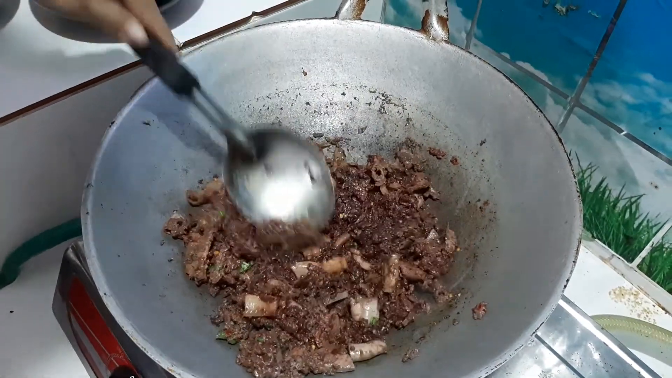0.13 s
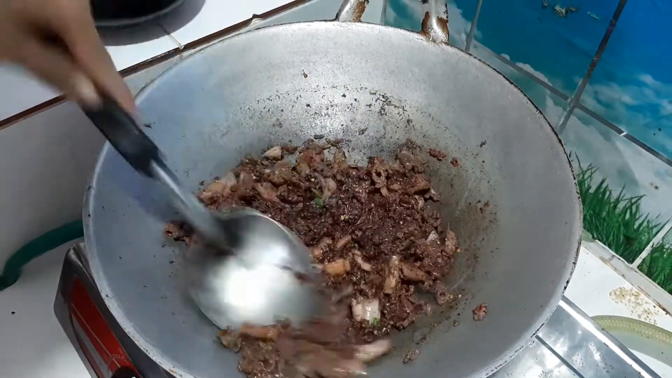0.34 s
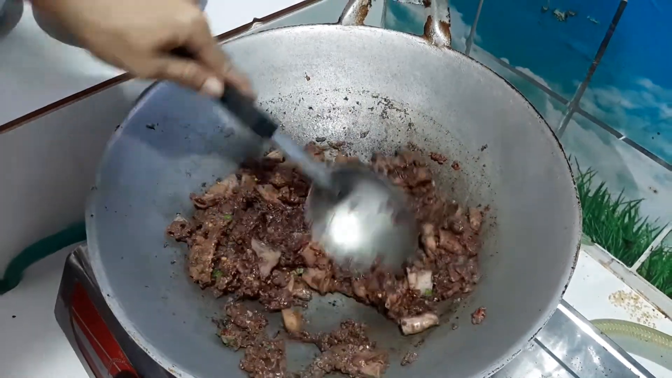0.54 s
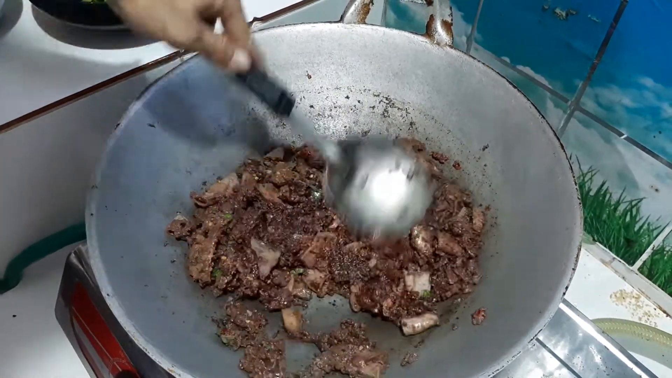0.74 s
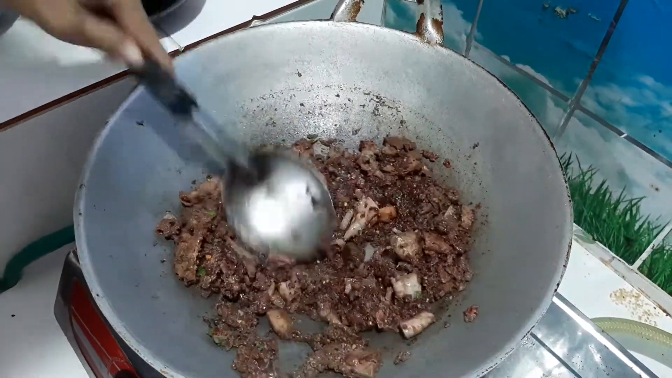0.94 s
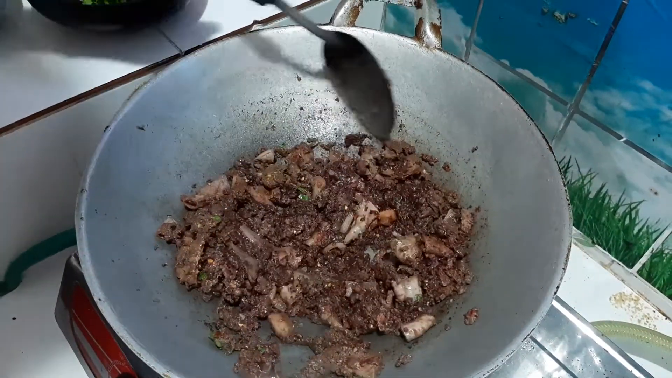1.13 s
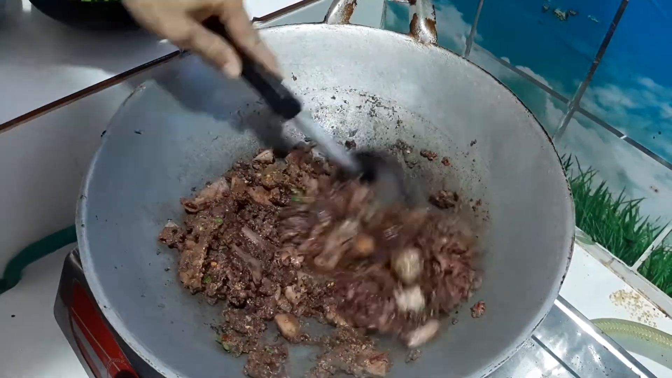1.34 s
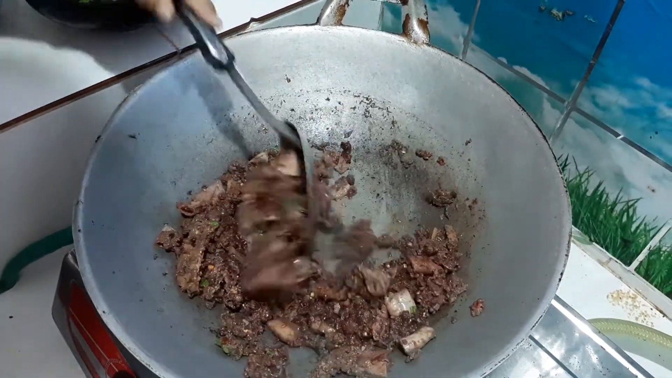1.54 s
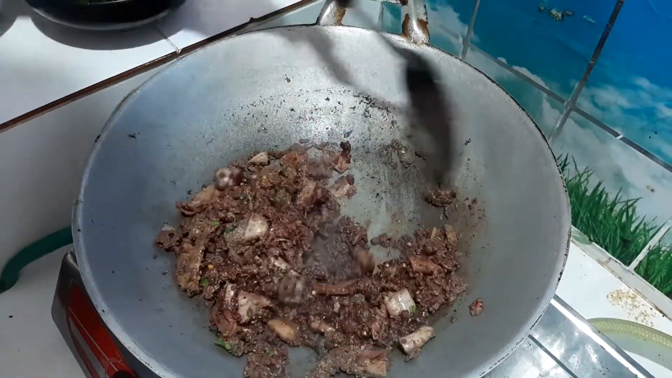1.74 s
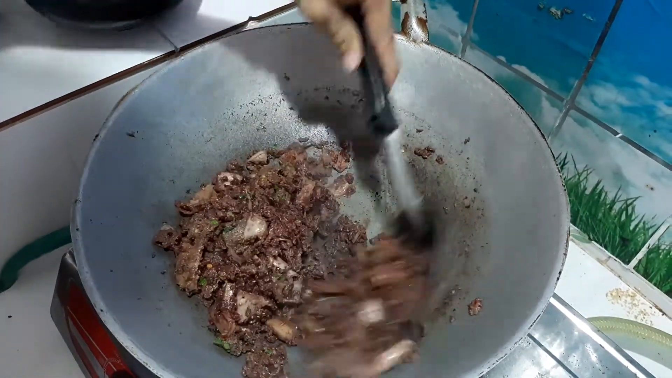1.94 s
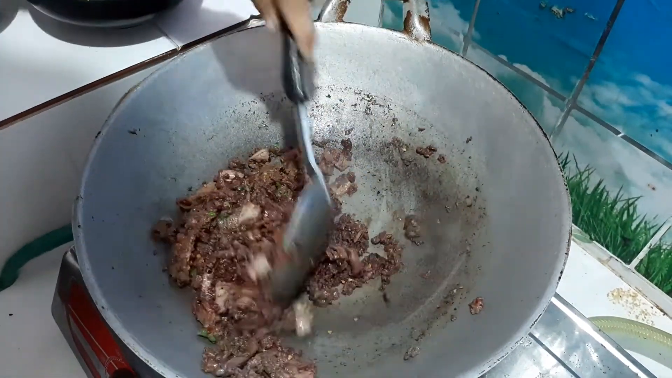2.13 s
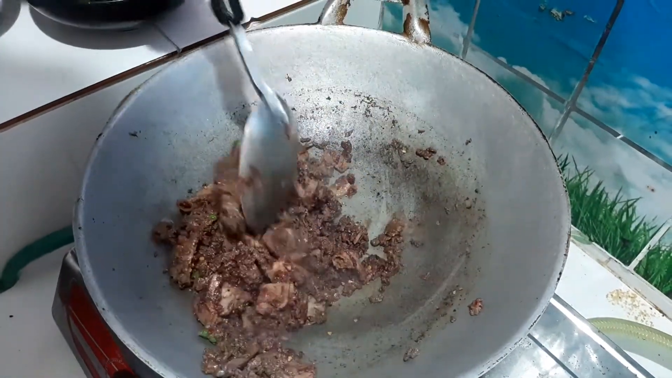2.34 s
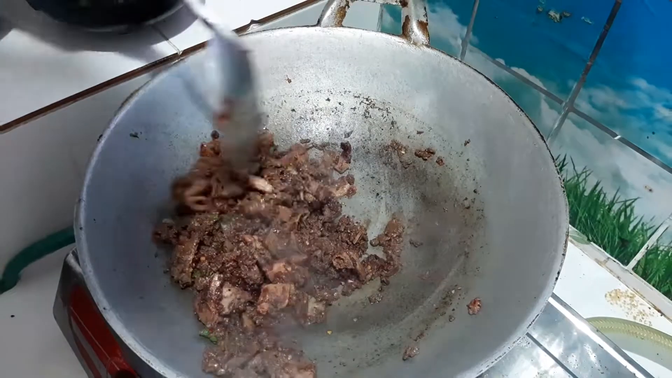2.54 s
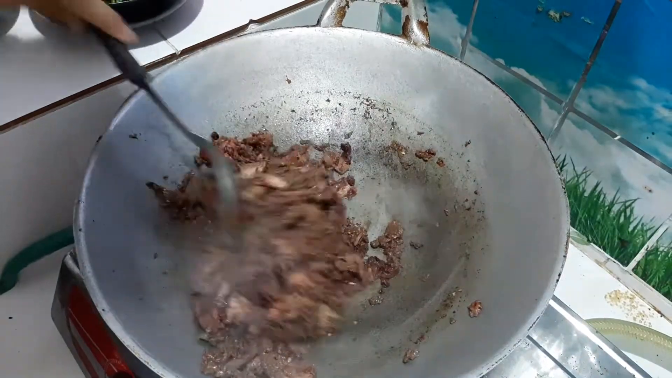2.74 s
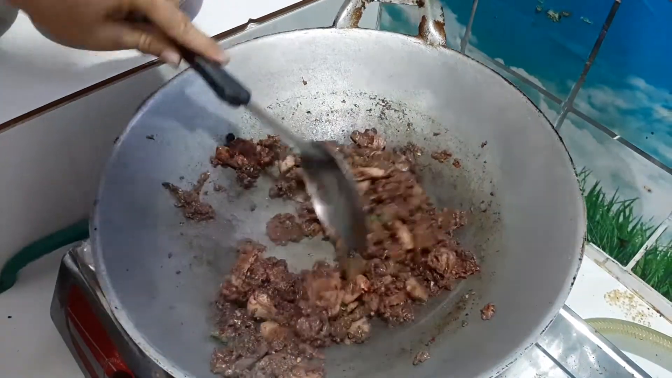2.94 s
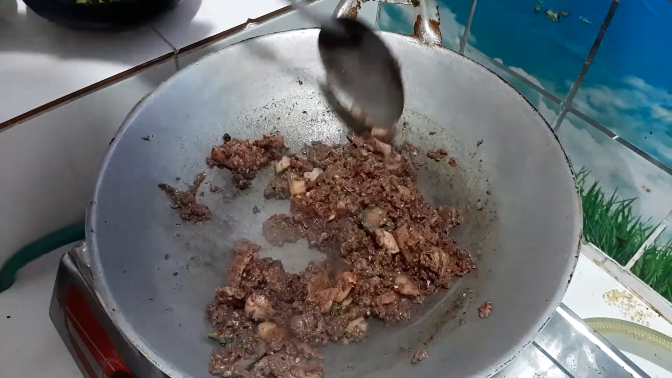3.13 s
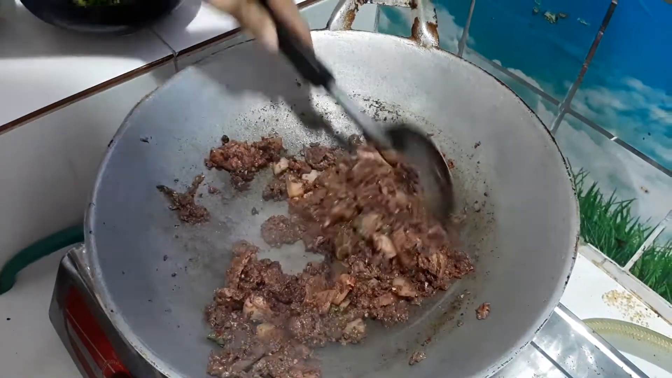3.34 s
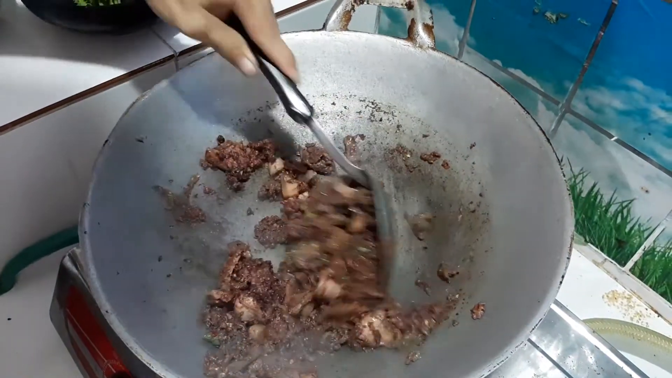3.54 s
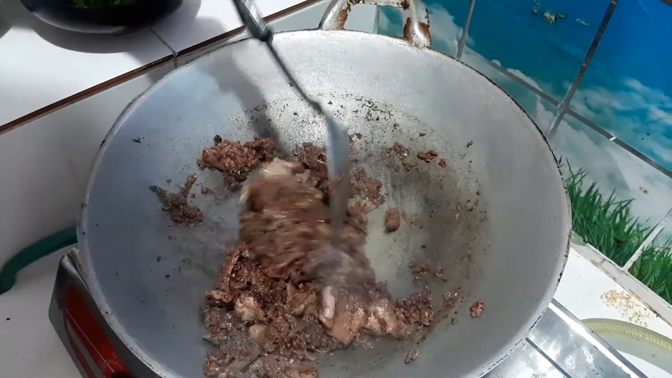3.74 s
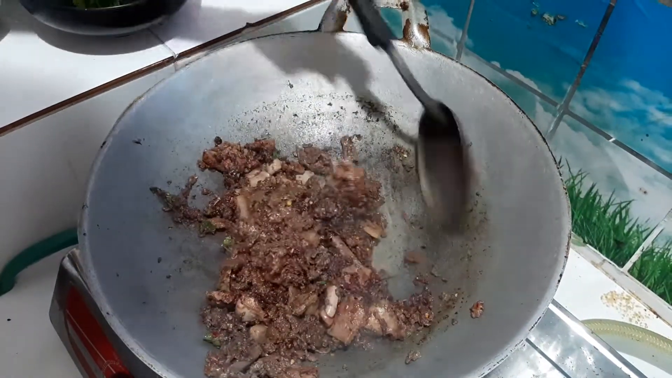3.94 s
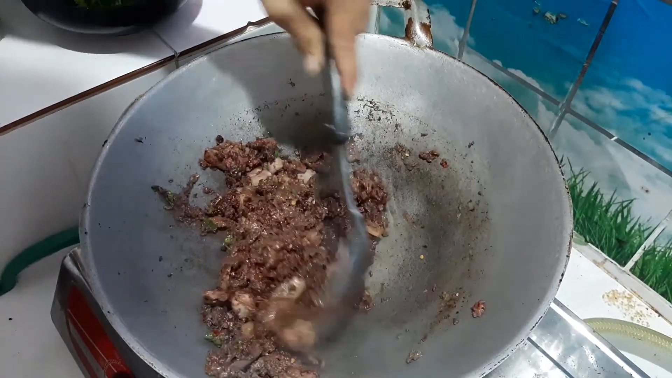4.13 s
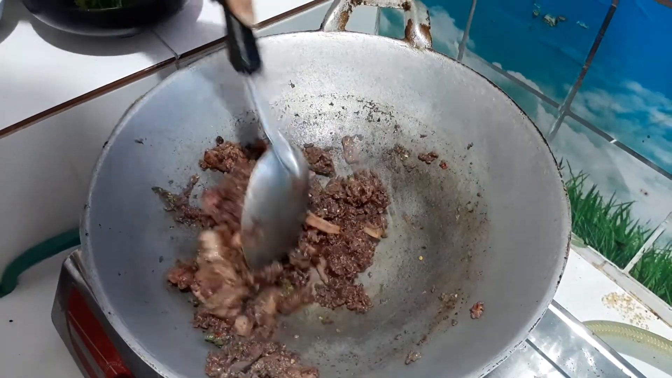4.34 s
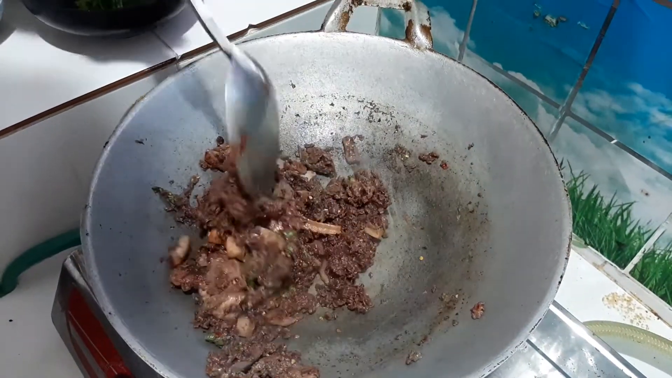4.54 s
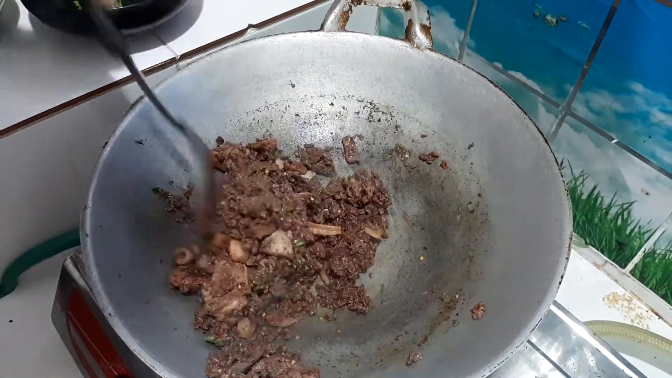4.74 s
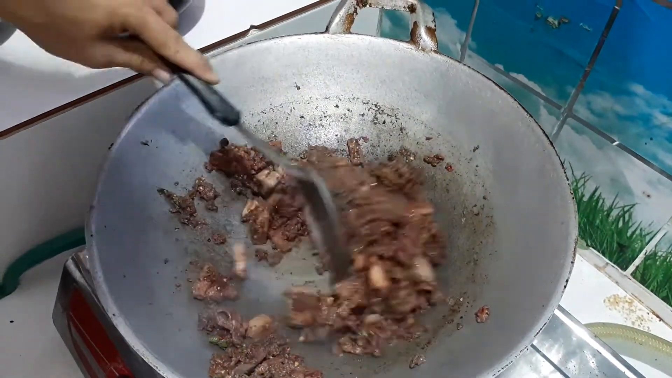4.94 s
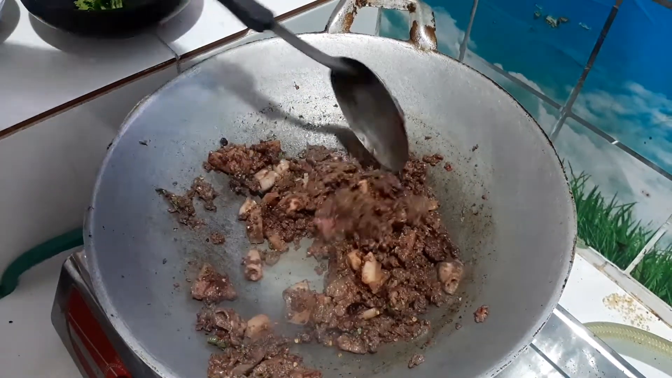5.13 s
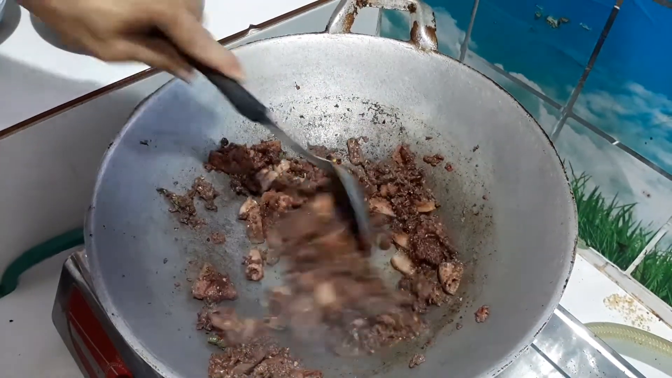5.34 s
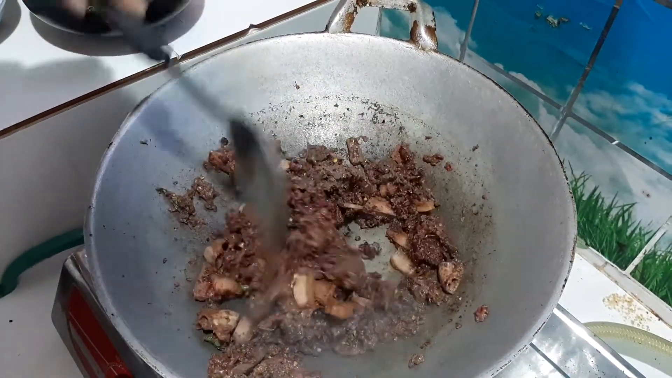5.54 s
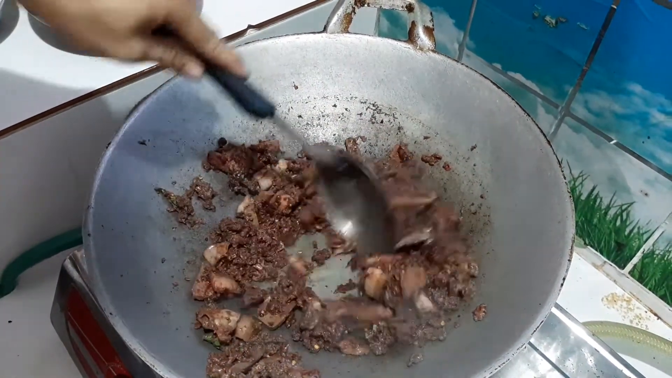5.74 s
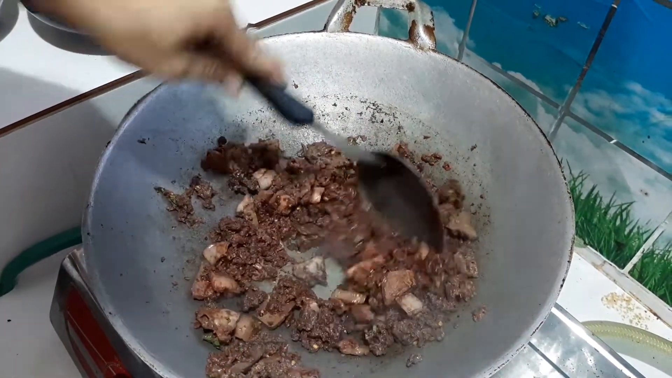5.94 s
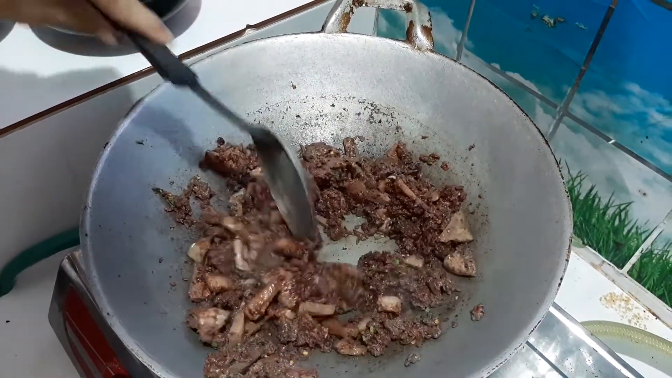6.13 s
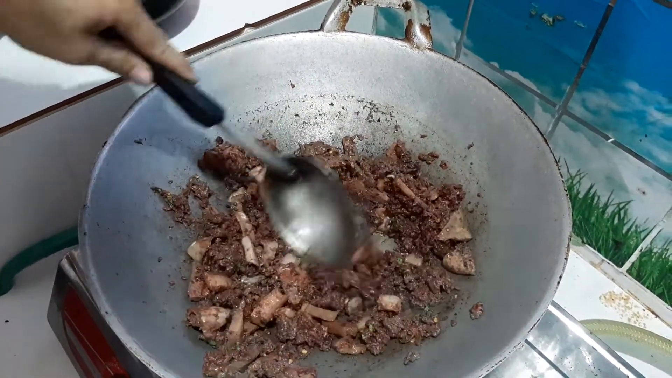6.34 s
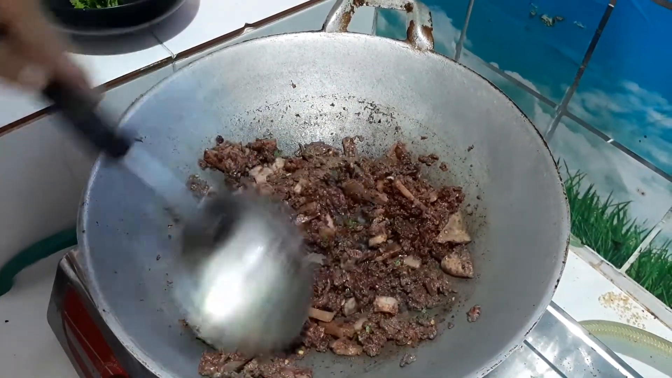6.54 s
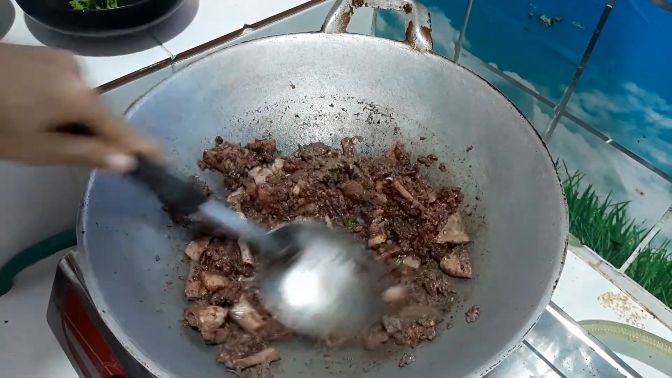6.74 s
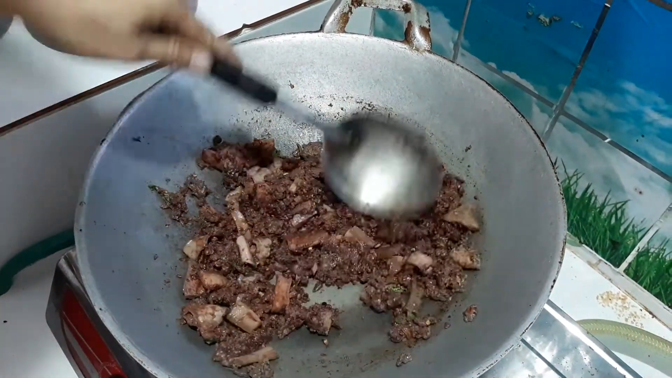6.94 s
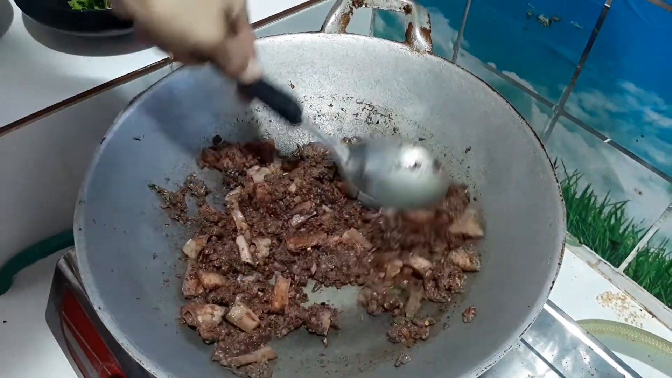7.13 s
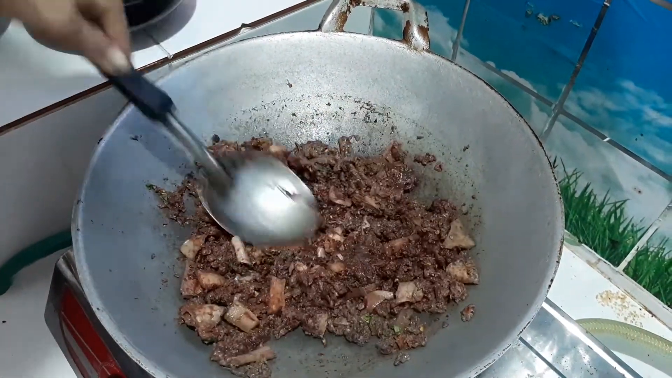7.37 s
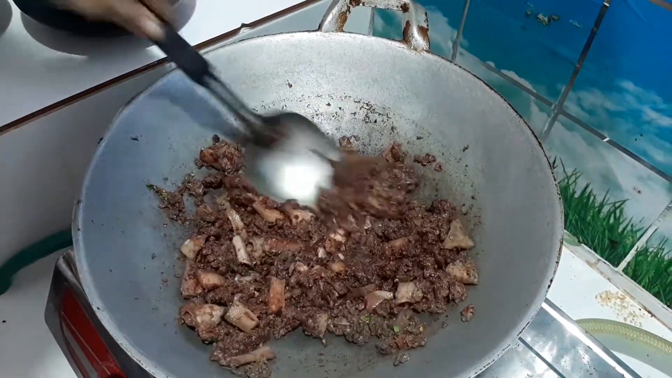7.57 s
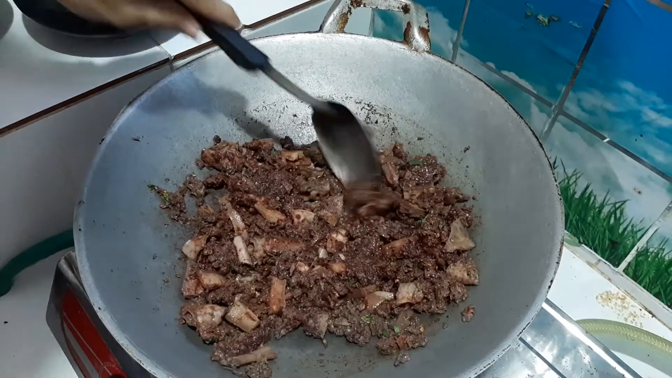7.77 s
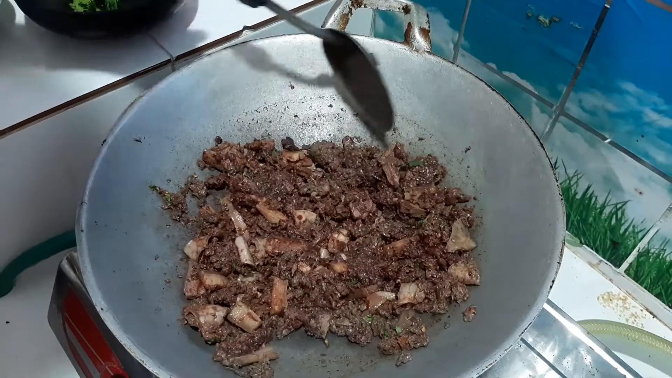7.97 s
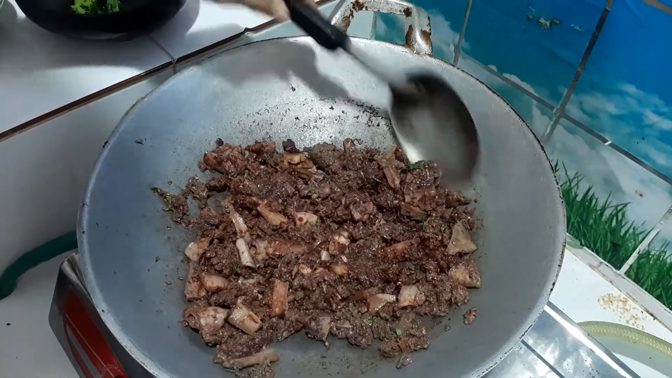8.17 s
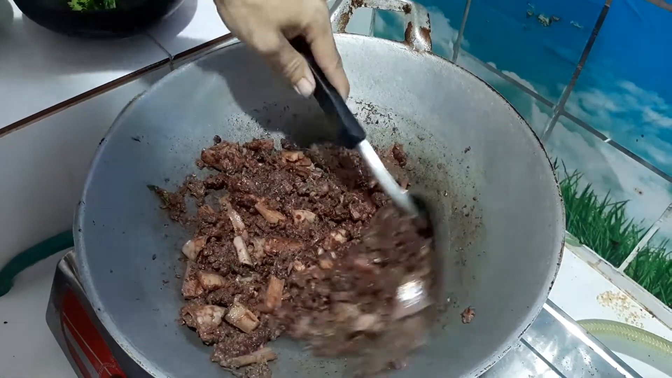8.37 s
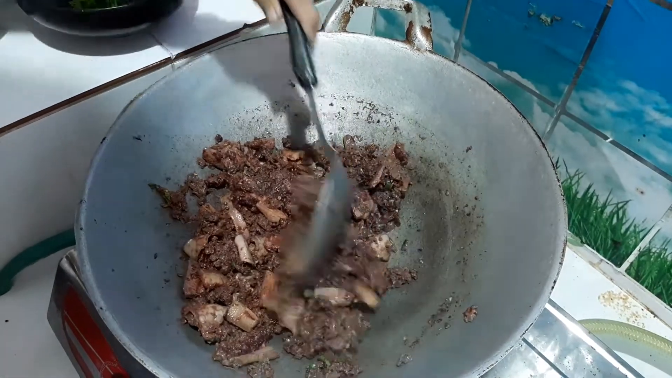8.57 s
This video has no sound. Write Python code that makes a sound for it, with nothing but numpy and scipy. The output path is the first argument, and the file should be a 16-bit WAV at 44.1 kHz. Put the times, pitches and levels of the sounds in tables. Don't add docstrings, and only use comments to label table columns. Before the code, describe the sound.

In a small tiled kitchen, hot fat sizzles without pause, swelling sharply around two and a half seconds, then easing before rising again late. A metal ladle clangs against the wok in irregular hits, some bouncing, followed by gritty scrapes and dull shoves of the meat. The strongest hits come in the first five seconds; afterwards mostly frying remains, with two faint taps. Close microphones, low flame rumble.

```python
import sys
import numpy as np
from scipy import signal
from scipy.fft import rfft, irfft, next_fast_len
from scipy.io import wavfile

SR = 44100
rng = np.random.default_rng(int(sys.argv[2]) if len(sys.argv) > 2 else 0)


def boost(x):
    u = np.asarray(x, float) / 20
    return 10 ** u


def inscribe(sig):
    pcm = np.round(np.clip(np.atleast_2d(sig).T, -1, 1) * 32767)
    wavfile.write(sys.argv[1], SR, pcm.astype(np.int16))


N = 379361

# [t/s, level/dB]
FRY = [(0, -44.5), (.8, -39.5), (1.25, -38), (1.63, -42.5), (1.9, -39), (2.47, -43.5), (2.55, -30),
       (3.01, -30.5), (3.11, -32.5), (3.26, -31), (3.6, -36), (4.6, -39), (5.66, -40.5), (5.85, -38),
       (7.4, -37), (7.68, -34.5), (8.24, -34), (8.6, -35.5)]
# [t/s, duration/s, gain/dB]
PRESSES = [(0.02, .1, 2), (0.866, 0.49, 3.5), (2.705, 0.13, 3.5), (3.004, 0.31, 2.5), (3.59, 0.062, 1),
           (4.1, 0.073, 2), (4.452, .08, 2), (6.45, 0.14, 0), (7.095, 0.19, 3), (7.62, 0.19, 4.5),
           (8.36, 0.26, 2)]
# [f/Hz, level/dB]
SPIT = [(3000, -35), (5000, -11.5), (6000, -3.5), (8600, -4), (10500, -1), (12500, 2.5), (15000, 0.5),
        (16500, -6.5)]
# [f/Hz, level/dB]
BUBBLING = [(250, -12.5), (500, -14.5), (900, -2), (1400, 1), (2500, -2.5), (3600, -1), (5000, -0.5),
            (7000, -5.5), (9000, -13.5), (13000, -16)]


def frying():
    t = np.arange(N) / SR
    spit_db, = curves(FRY)
    pressed_db = sum(db * np.exp(-((t - s) / lasts) ** 2) for s, lasts, db in PRESSES)
    bubble_db = -41 + 0.36 * (spit_db + 39) + pressed_db
    surge = wobble(5.6)
    spit = unit(filtered(grit(9000, 1.2, channels=2), lambda f: boost(along(SPIT, f))))
    bubbles = unit(filtered(grit(5000, 1.87, channels=2), lambda f: boost(along(BUBBLING, f))))
    spit *= boost(spit_db + 2.0 + 0.33 * surge + 1.12 * wobble(40))
    bubbles *= boost(bubble_db + 0.19 * surge + 0.87 * wobble(25))
    pan_db = 0.7
    return (spit + bubbles) * boost(np.array([[.5], [-.5]]) * pan_db + 3)


# [t/s, peak level/dB, favoured f/Hz, crack re peak/dB, left-right/dB]
BLOWS = [
    (1.1589, -2.5, 4280, -30, 0.5),
    (1.8049, -8, 4700, -5, 2),
    (2.7444, -16.5, 4850, -15, 3.5),
    (3.245, -13, 4280, -13, 4),
    (3.9784, -24, 4110, -14, 7),
    (3.9921, -16.5, 3900, -6.5, 10),
    (4.0718, -20, 4870, -7, 12),
    (4.789, -9.5, 5100, -9.5, 4),
    (7.1407, -27, 4360, -10.5, 5.5),
    (8.0994, -26, 3530, -6, 0.5),
]
# [f/Hz, bandwidth/Hz, level/dB]
STRUCK = [(3090, 140, -10), (3700, 87, 0), (4330, 120, -3), (4760, 110, -4.5), (5100, 140, -2),
          (5520, 160, -7.5), (6180, 140, -4), (7110, 150, -3.5), (7950, 100, -12), (8560, 170, -11)]


def ladle_blows():
    out, t = np.zeros((2, N + SR)), np.arange(SR // 4) / SR
    crack_t60 = 0.0097
    for s, db, near_hz, crack_db, pan_db in BLOWS:
        crack = boost(crack_db + 2.0 - 60 * t / crack_t60) * rng.standard_normal((2, len(t)))
        ring = strike(STRUCK, 0.89, near_hz, focus_db=6, rattle_s=0.012)
        pan = boost([[pan_db / 2], [-pan_db / 2]])
        add(out, s, boost(db + 5.0) * (ring + crack) * pan)
    return out[:, :N]


# [t/s, boom level/dB, clank re boom/dB, favoured f/Hz]
KNOCKS = [(1.158, -22.5, -4, 490), (1.806, -28.5, 4.5, 650), (1.859, -23, 2, 479),
          (2.744, -36.5, 14.5, 560), (3.243, -22, -4, 674), (3.979, -22, 4.5, 705), (3.991, -31, 7.5, 590),
          (4.787, -23.5, 7.5, 460), (4.796, -22.5, 6, 493), (4.965, -28, -12, 500), (7.138, -41, 8, 496),
          (8.1, -30, -9, 581), (8.389, -47.5, 10, 650)]
# [f/Hz, bandwidth/Hz, level/dB]
BOOM = [(125.2, 9.2, 14.5), (214.3, 21.7, 0), (306.6, 18.7, 0), (381, 33, -3)]
# [f/Hz, bandwidth/Hz, level/dB]
CLANK = [(490, 27, 2.5), (587.2, 11.2, 2.5), (687, 32, 0), (845, 80, -5.5), (1044, 29, -4.5)]


def bowl_knocks():
    out = np.zeros((2, N + SR))
    for s, db, clank_db, clank_hz in KNOCKS:
        boom = strike(BOOM, 0.31, 260, focus_db=16.5, rattle_s=0.0125)
        clank = strike(CLANK[:3], 0.276, clank_hz, focus_db=47.0, rattle_s=0.0071)
        add(out, s + 0.00121, boost(db - 0.6) * (boom + boost(clank_db + 1.5) * clank))
    return out[:, :N]


# [t/s, level/dB, favoured f/Hz]
CLANGS = [(1.159, -13, 880), (1.807, -28, 2270), (2.745, -30, 1530), (3.244, -8.5, 2280),
          (3.246, -11, 1000), (3.98, -18.5, 2600), (3.992, -20, 2600), (4.788, -11, 1390),
          (4.797, -9, 1020), (7.139, -26.5, 900), (8.101, -22, 900), (8.102, -21, 2000), (8.39, -31, 2590)]
# [f/Hz, bandwidth/Hz, level/dB]
UPPER = [(1118, 26, -4), (1446, 110, -1.5), (1720, 120, -7.5), (2110, 140, -3), (2280, 43, 1.5),
         (2530, 170, -2)]


def wall_clangs():
    out = np.zeros((2, N + SR))
    for s, db, near_hz in CLANGS:
        add(out, s, boost(db) * strike(CLANK[3:] + UPPER, 0.68, near_hz, focus_db=13, rattle_s=0.018))
    return out[:, :N]


# [t/s, hold/s, scrape level/dB, brightness re scrape/dB, favoured f/Hz]
SCRAPES = [(1.24, 0.05, -34, -6, 3450), (1.89, 0.062, -21, -4, 3600), (2.04, 0.013, -35.5, -2, 4100),
           (2.762, .01, -28, -5, 4020), (2.86, 0.12, -45, 6, 3750), (3.33, .02, -37, -0.5, 3610),
           (3.45, 0.028, -49, 5, 3850), (4.04, .02, -27.5, -4.5, 3700), (4.07, 0.02, -26, 2, 4000),
           (4.14, 0.045, -32.5, -7, 4300), (4.86, 0.035, -44, -6, 3900), (7.154, .015, -37, -2, 4020),
           (8.23, 0.059, -35, -10, 4350), (8.31, 0.041, -32, -5, 3630), (8.37, 0.018, -38, -3, 4100)]
# [t/s, hold/s, scrape level/dB, brightness re scrape/dB, favoured f/Hz]
SKIDS = [
    (1.172, 0.0027, -32, -1, 3700),
    (1.812, 0.0038, -27, 0, 3700),
    (3.252, 0.0026, -29.5, -1, 3900),
    (3.982, 0.028, -27, -3, 3800),
    (4.802, 0.042, -32.5, -1.5, 3900),
    (8.102, .1, -44, 5, 4400),
]
# [f/Hz, bandwidth/Hz, level/dB]
LADLE = [(2982, 52, -1), (3186, 71, -2.5), (3454, 49.6, -3.5), (3600, 68, -1), (3900, 1100, -11.5),
         (4000, 210, -2.5), (4224, 66, -1), (4500, 150, -1)]
# [f/Hz, bandwidth/Hz, level/dB]
RIM = [(4866, 68, 1), (5110, 180, -6), (4945, 1600, -9.5), (5400, 99, 1.5), (5680, 64, -9.5),
       (6460, 390, -4.5), (7150, 130, -4.5), (7870, 130, -3), (8200, 220, -14), (10700, 3400, -11)]


def scraping():
    slides = strokes(SCRAPES, rise=640, fall=360) + strokes(SKIDS, rise=2100, fall=360)
    return rubbing(slides, [LADLE, RIM], per_s=6000, spread_db=2.2, apart=.78, focus_db=12, wander_db=4)


# [t/s, hold/s, level/dB, favoured f/Hz]
RUBS = [(1.175, 0.015, -46, 1100), (1.255, .06, -38, 1770), (1.82, .04, -39, 2400), (1.9, 0.056, -37, 2170),
        (2.04, 0.024, -42, 1500), (2.746, 0.035, -32, 570), (.9, .05, -44, 800), (2.88, .08, -43.5, 800),
        (3.255, .01, -34.5, 2300), (3.3, .05, -45, 1050), (3.985, 0.018, -34, 650), (3.99, .04, -36, 2450),
        (4.07, 0.035, -39, 2400), (4.09, 0.054, -45, 1400), (4.802, 0.035, -34.5, 1250),
        (4.88, 0.045, -43, 1050), (8.385, 0.023, -45, 640), (8.11, 0.16, -45, 2000),
        (8.28, 0.074, -44, 1450), (8.3, .07, -38, 2550)]


def wall_singing():
    rubs = strokes(RUBS, rise=1800, fall=360)
    return rubbing(rubs, [CLANK[1:] + UPPER], per_s=6000, spread_db=2.2, apart=.7, focus_db=22, wander_db=3)


# [t/s, hold/s, drag level/dB, dry rasp re drag/dB, favoured f/Hz]
SHOVES = [(.4, 0.075, -55, 3, 260), (.54, 0.011, -48, -4, 270), (.85, .04, -39.5, -13, 283),
          (.92, .03, -32.5, -4, 235), (1.09, 0.036, -51, -5, 250), (1.32, .01, -40, -7, 283),
          (1.46, .04, -52.5, 1.5, 258), (2.02, 0.0087, -41.5, -3, 293), (2.735, 0.056, -40.5, -1, 278),
          (2.86, 0.036, -33.5, -7, 336), (2.91, 0.057, -31.5, -8, 226), (3.03, 0.025, -41, -12, 253),
          (3.46, .01, -47, -8, 238), (3.55, 0.069, -45, -5.5, 265), (4.13, .03, -51, 6, 280),
          (4.975, .01, -41, -4, 267), (5.67, .01, -51, -11, 255), (6.47, .04, -51, -1, 251),
          (6.9, 0.11, -60, 4, 250), (7.19, 0.0091, -34.5, -10, 271), (7.4, .02, -56, 5, 262),
          (7.57, 0.12, -62.5, 10, 270), (8.238, 0.0088, -41.5, -11, 242), (8.32, 0.13, -56, 3, 255)]
# [t/s, hold/s, drag level/dB, dry rasp re drag/dB, favoured f/Hz]
JOLTS = [
    (1.172, 0.0087, -32, 1.5, 250),
    (1.808, 0.084, -28, -8.5, 280),
    (3.255, 0.049, -36, 0, 226),
    (3.986, 0.0087, -30.5, -6, 275),
    (4.795, 0.022, -29.5, 4.5, 276),
    (8.1, 0.11, -42, 1, 245),
]


def shove_strokes():
    return strokes(SHOVES, rise=314, fall=189) + strokes(JOLTS, rise=1800, fall=189)


def shoving(shoves):
    return rubbing(shoves, [BOOM, CLANK], per_s=2500, spread_db=3, apart=.22, focus_db=30, wander_db=2)


# [f/Hz, level/dB]
FLAME = [(20, -32.5), (35, -19), (60, 1), (85, -5.5), (124, -1), (170, -9), (250, -19), (500, -7),
         (900, -10.5), (1600, -46)]


def burner(shoves):
    mid, side = filtered(rng.standard_normal((2, N)), lambda f: boost(along(FLAME, f)))
    roar = unit(np.array([1.73 * mid + .5 * side, mid - .5 * side]))
    hum = unit(shake(rng.standard_normal((2, N)), [BOOM[2], CLANK[1]], apart=0.18)[:, :N])
    level = boost(-58.5 + 0.84 * wobble(6))[None]
    shake_db = -24.5
    for rows in shoves:
        drag_db = curves(rows, extent(rows))[0]
        add(level, rows[0][0], boost(drag_db + shake_db)[None])
    return boost(5.5) * level * roar + boost(-62.5) * hum


# [f/Hz, t60/s]
KITCHEN = [(200, 0.35), (2000, 0.3), (10000, 0.16)]


def kitchen(x):
    hz, t, z = signal.stft(rng.standard_normal((2, SR // 2)), SR, nperseg=256)
    decay = boost(-60 * t / along(KITCHEN, hz)[:, None])
    tail = signal.istft(z * decay, SR, nperseg=256)[1]
    delayed = np.pad(x, ((0, 0), (200, 0)))
    return signal.fftconvolve(delayed, tail / np.linalg.norm(tail[0]), axes=1)[:, :N]


def rubbing(tables, families, per_s, spread_db, apart, focus_db, wander_db):
    out = np.zeros((2, N + SR))
    rough = grit(per_s, spread_db)[0] * boost(1.36 * wobble(60))
    for rows in tables:
        span = extent(rows)
        db, *rel_db, near_hz = curves(rows, span)
        force = rough[span] * signal.windows.tukey(len(db), 500 / len(db))
        for k, (table, more_db) in enumerate(zip(families, [0, *rel_db])):
            g = favour(table, near_hz[0], focus_db * (k == 0))
            g = g * boost(wander_db * np.array([wobble(24.96, count=len(db)) for _ in table]))
            power = np.pi / SR * np.transpose(table)[1] @ g ** 2
            driven = force * boost(db + more_db) * g / np.sqrt(power)
            add(out, rows[0][0], shake(driven, table, apart))
    return out[:, :N]


def strike(table, apart, near_hz, focus_db, rattle_s):
    t = np.arange(SR // 12) / SR
    rattle = 0.18 * rng.standard_normal((len(table), len(t))) * boost(-60 * t / rattle_s)
    contact = (t == 0) + rattle
    ring = shake(contact * favour(table, near_hz, focus_db), table, apart)[:, :SR // 4]
    return ring / np.abs(ring).max()


def shake(forces, table, apart):
    c, w, _ = np.transpose(table)[:, :, None]
    m = next_fast_len(forces.shape[1] + SR // 6)
    f = np.fft.rfftfreq(m, 1 / SR)
    lead = apart * rng.choice([-1, 1], len(c)) * rng.uniform(.6, 1.3, len(c))
    ears = (-1) ** np.arange(len(c)) * np.exp(1j * np.outer([1, -1], lead))
    resonance = 1j * f * w / (c * c - f * f + 1j * f * w)
    return irfft(ears @ (rfft(forces, m) * resonance), m)


def favour(table, near_hz, focus_db):
    c, _, db = np.transpose(table)[:, :, None]
    return boost(db - focus_db * abs(np.log2(c / near_hz)))


def strokes(rows, rise, fall):
    fade = 28
    out = []
    for s, held, db, *rest in rows:
        end = s + abs(held)
        out.append([(s - fade / rise, db - fade, *rest), (s, db, *rest),
                    (end, db, *rest), (end + fade / fall, db - fade, *rest)])
    return out


def extent(rows):
    return slice(round(rows[0][0] * SR), min(N, round(rows[-1][0] * SR)))


def grit(per_s, spread_db, channels=1):
    when, size, sign = rng.random((3, channels, N))
    out, hit = np.zeros((channels, N)), when < per_s / SR
    out[hit] = boost(-spread_db * np.log(size[hit] + 1e-3)) * np.sign(sign[hit] - .5)
    return unit(out)


def wobble(rate, count=N):
    knots = rng.standard_normal(int(N * rate / SR) + 2)
    return np.interp(np.arange(count) * rate / SR, np.arange(len(knots)), knots)


def filtered(x, response):
    m = next_fast_len(x.shape[-1] + SR // 4)
    return irfft(rfft(x, m) * response(np.fft.rfftfreq(m, 1 / SR)), m)[..., :x.shape[-1]]


def along(points, hz):
    f, v = np.transpose(points)
    return np.interp(np.log(hz + 1), np.log(f + 1), v)


def curves(rows, span=slice(0, N)):
    s, *cols = np.transpose(rows)
    return [np.interp(np.arange(span.start, span.stop) / SR, s, c) for c in cols]


def unit(x):
    return x / np.sqrt(np.mean(x ** 2) + 1e-20)


def add(out, s, sound):
    out[:, round(s * SR):][:, :sound.shape[1]] += sound


def scene():
    shoves = shove_strokes()
    friction = boost([[.3], [-1.3]]) * shoving(shoves) + boost(2.5) * (scraping() + wall_singing())
    metal = friction + ladle_blows() + bowl_knocks() + wall_clangs()
    return frying() + metal + boost(-10.5) * kitchen(metal) + burner(shoves)


def top_cut(x):
    return signal.sosfilt(signal.butter(12, 16990, fs=SR, output="sos"), x)


def record(dry):
    squashed = dry / (1 + abs(dry / .95) ** 6) ** (1 / 6)
    mix = filtered(squashed, lambda hz: hz < 15800)
    return top_cut(mix)


dry = scene()
out = record(dry)
inscribe(out)
```